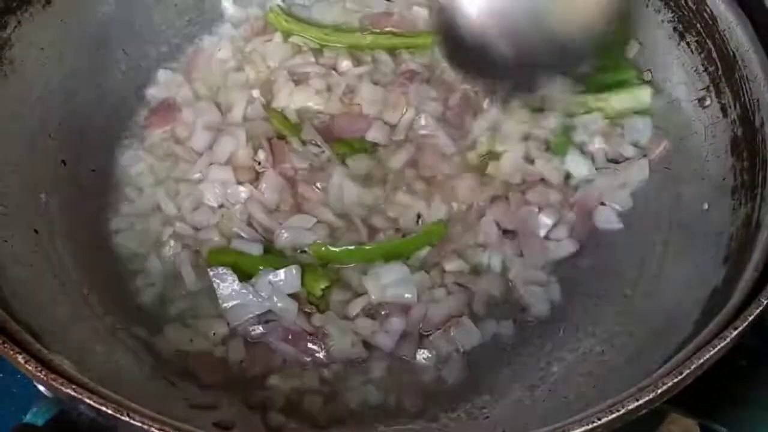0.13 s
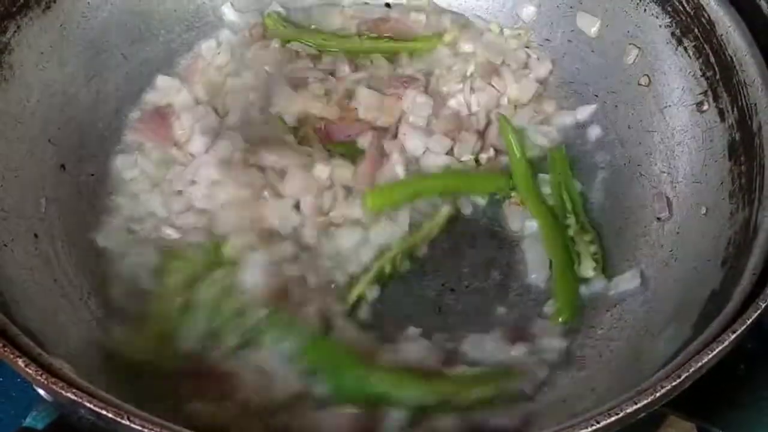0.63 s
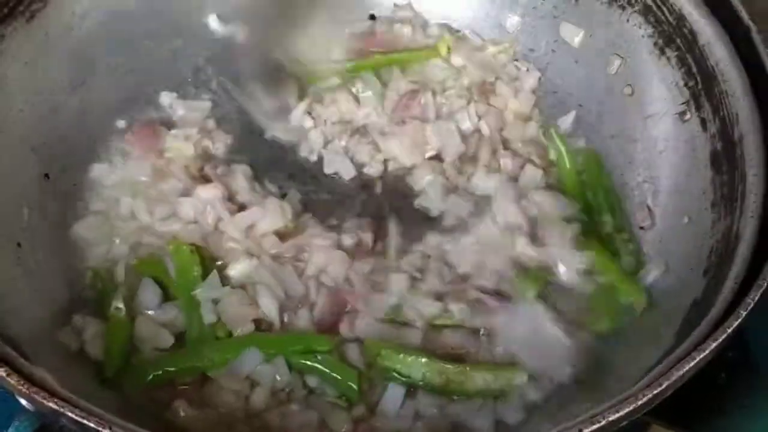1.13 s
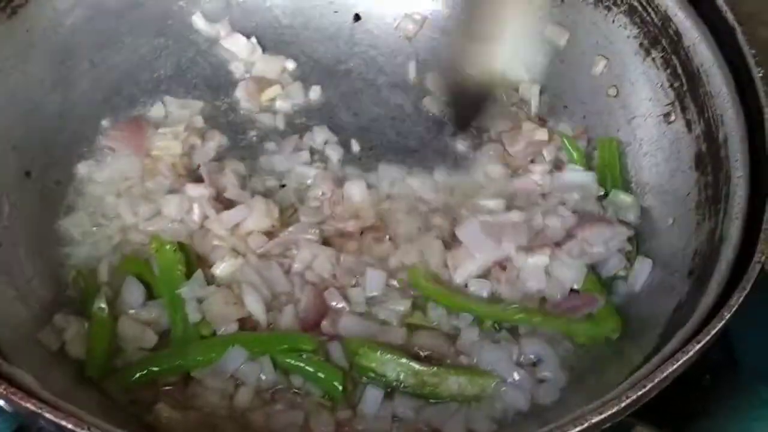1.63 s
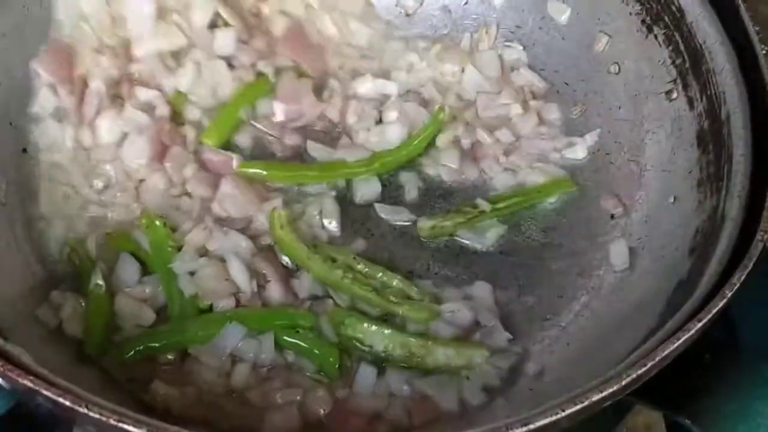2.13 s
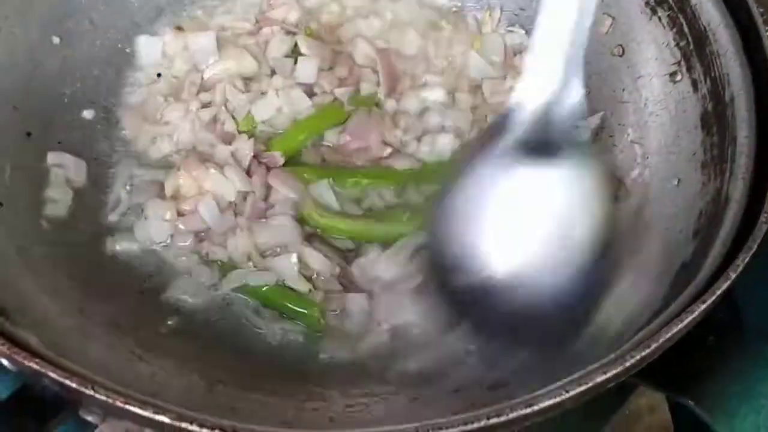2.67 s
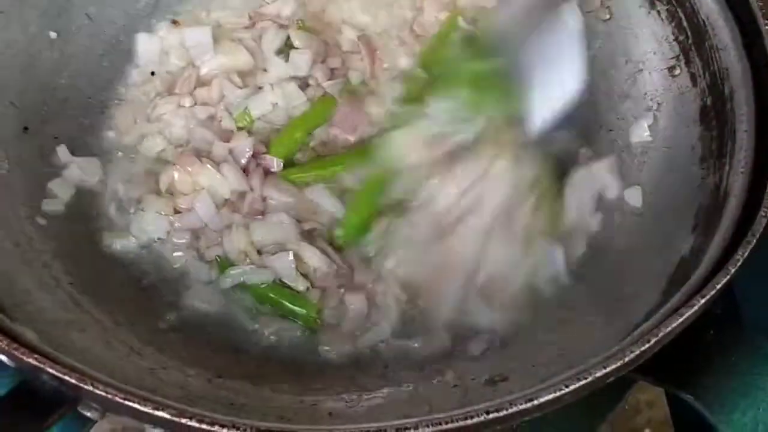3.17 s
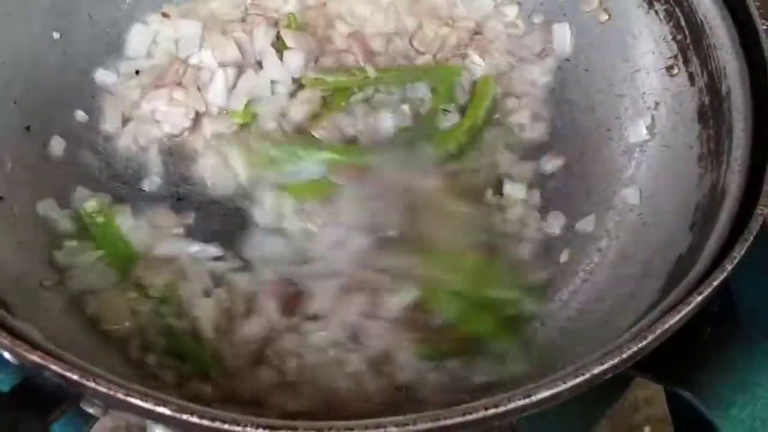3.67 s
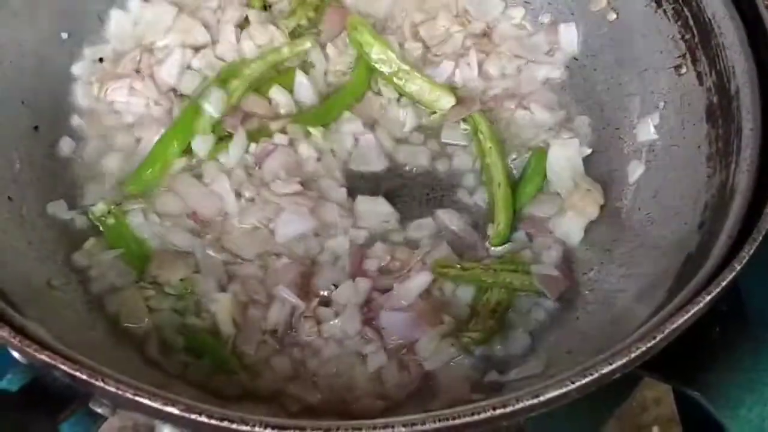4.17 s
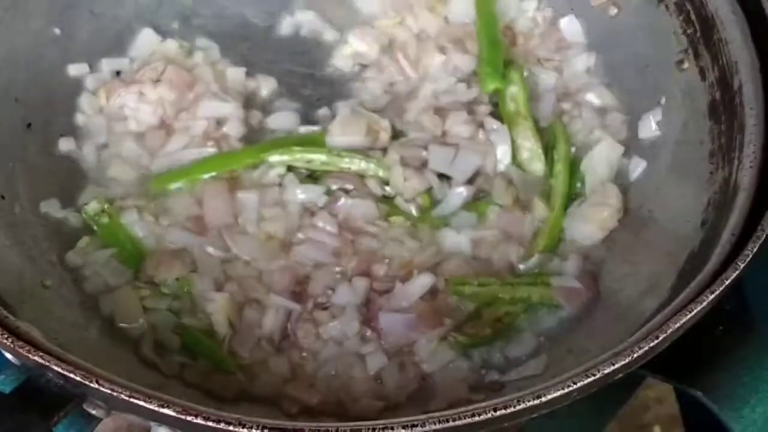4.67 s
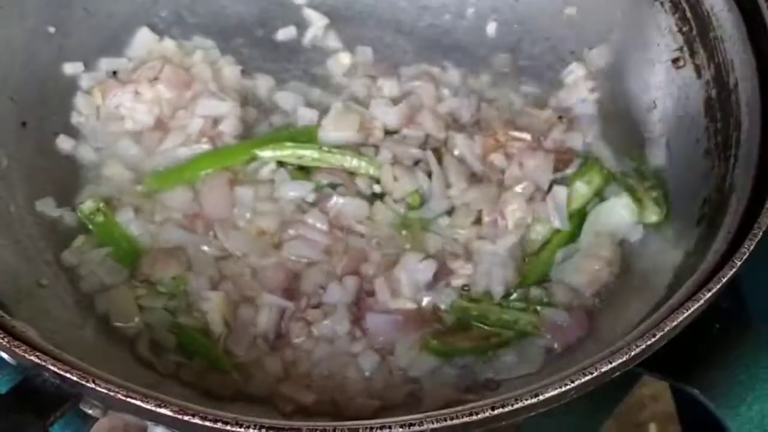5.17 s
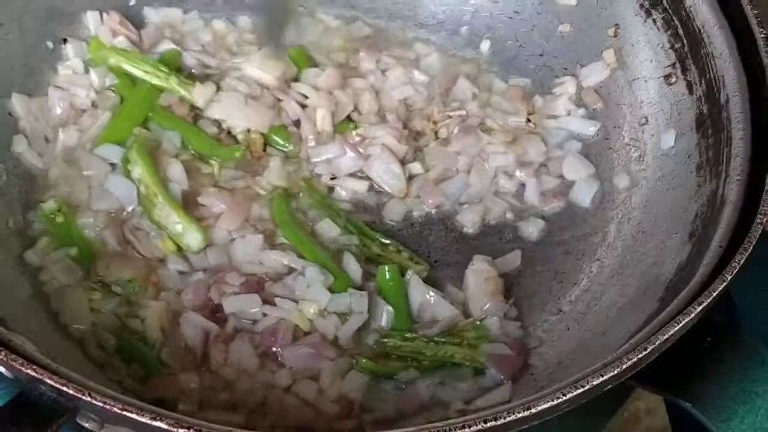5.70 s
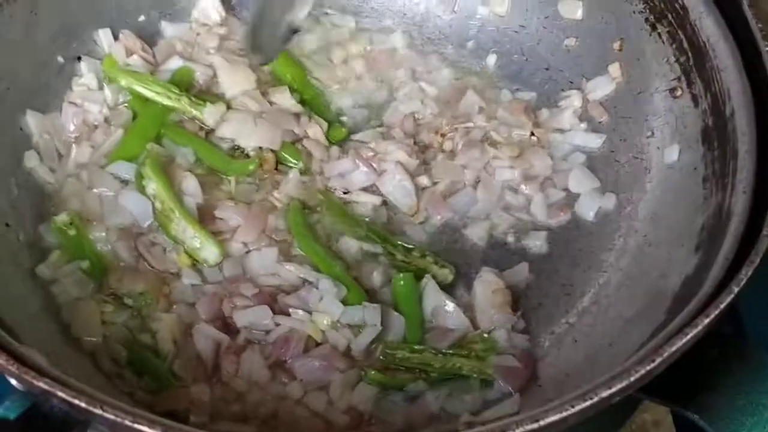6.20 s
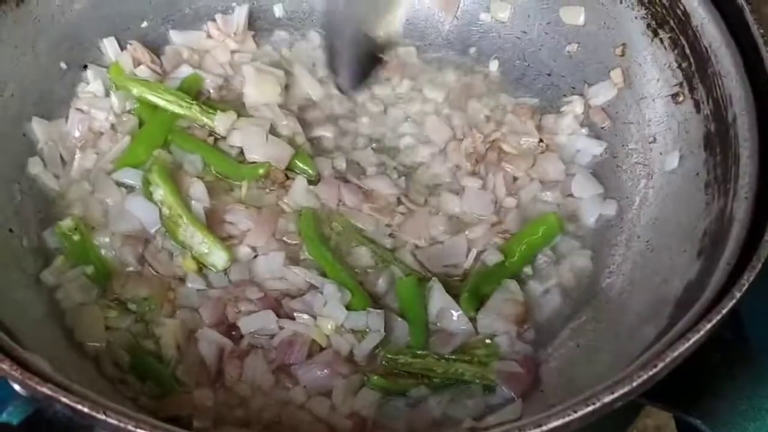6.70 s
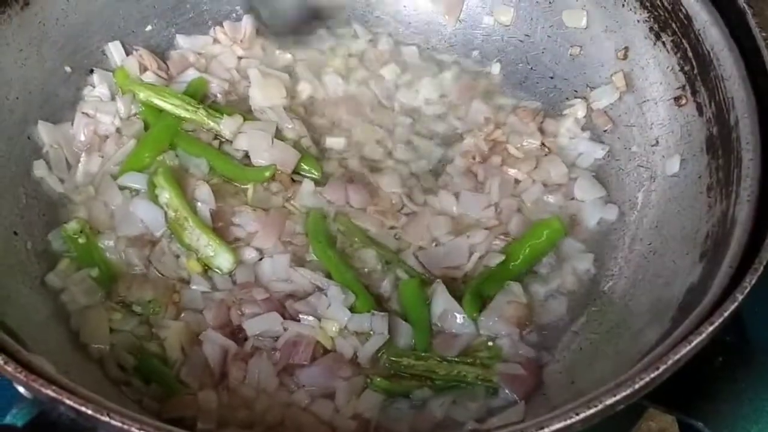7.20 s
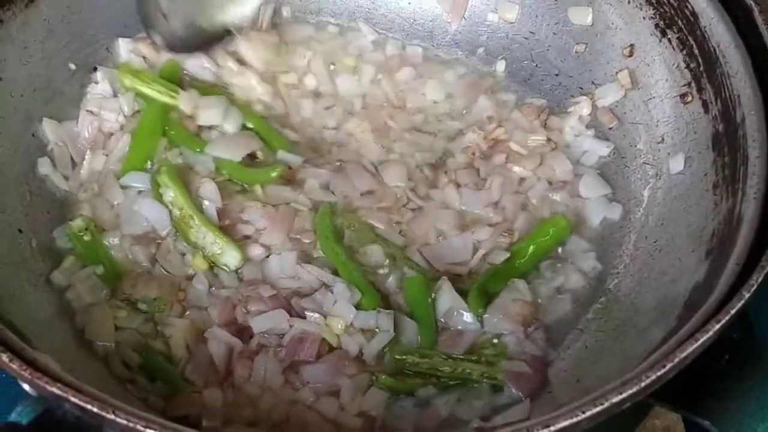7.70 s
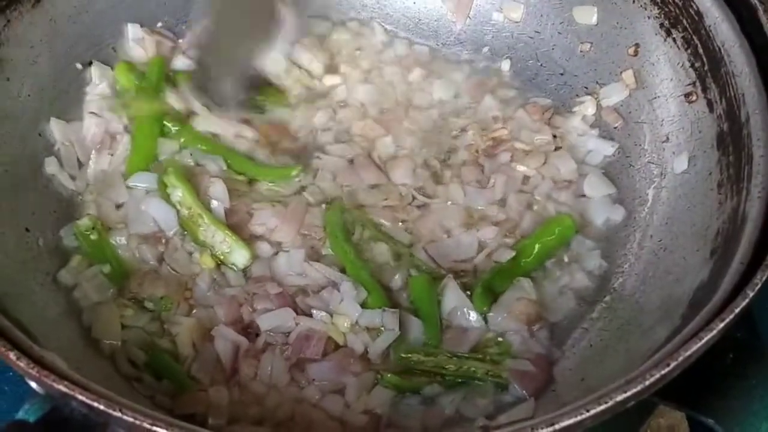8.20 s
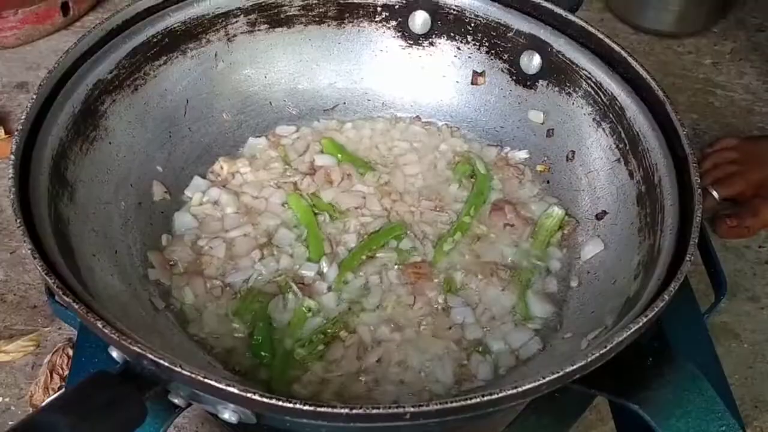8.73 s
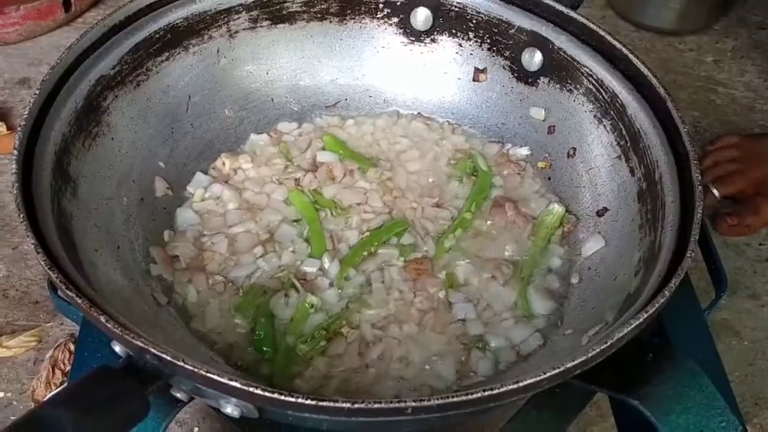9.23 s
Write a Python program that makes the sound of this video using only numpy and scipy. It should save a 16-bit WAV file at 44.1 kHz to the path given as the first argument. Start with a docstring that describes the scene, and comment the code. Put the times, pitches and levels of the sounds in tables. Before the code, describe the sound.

Onions and chillies fry in oil in a metal pan, very close to a small, bright microphone. A dense sizzle runs throughout, broken by sharp pops and snapping steam. A steel ladle knocks and briefly scrapes the pan, busiest in the first five seconds. A faint engine rumbles far off. The background level keeps jumping and dipping, then everything cuts off at about 8.7 seconds.

```python
"""Chopped onions and chillies fry in oil in a round metal pan, close under a small microphone.
From the start, bursting steam bubbles sizzle as clicks and noise, over a far engine of sine waves and a noise rumble.
Louder pops (short filtered bursts) and snaps (single pressure steps) soon break out of the sizzle.
Then a steel ladle knocks and scrapes the pan, ringing its modes, which are sine waves that die away.
The whole background jumps up in level and dips briefly all along, until everything stops dead."""
import sys
import numpy as np
from scipy import signal
from scipy.fft import rfft, irfft
from scipy.io import wavfile
from scipy.ndimage import uniform_filter1d

SR = 44100
rng = np.random.default_rng(int(sys.argv[2]) if len(sys.argv) > 2 else 0)


def waveform_to_disk(signal):
    """Save audio, clipped to [-1, 1], as 16-bit WAV at the path in sys.argv[1]."""
    frames = np.transpose(np.atleast_2d(signal))
    scaled = np.clip(frames, -1, 1) * 32767
    samples = np.round(scaled).astype(np.int16)
    wavfile.write(sys.argv[1], SR, samples)


def boost(x):
    """Linear amplitude factor 10**(x/20) for a level x in decibels (scalar or array-like)."""
    u = np.asarray(x, float) / 20
    return 10 ** u


N = 412315
STOP_S = 8.693  # all sound ends here


def level(x, db):
    """Scale to an rms level."""
    return x * boost(db) / np.sqrt(np.mean(x ** 2))


def band(x, hz, width):
    """Resonant band-pass, centre and width in Hz."""
    return signal.lfilter(*signal.iirpeak(min(hz, .45 * SR), hz / width, fs=SR), x)


def response(points, size=2048):
    """Causal impulse response with the colour of (Hz, dB) points, its energy as early as possible."""
    hz, db = np.transpose(points)
    f = np.arange(size // 2 + 1) * SR / size
    log_gain = np.log(boost(np.interp(np.log(f + 1), np.log(hz), db)))
    # folding the cepstrum forward in time makes the response causal
    cepstrum = irfft(log_gain)
    cepstrum[1:size // 2] *= 2
    cepstrum[size // 2 + 1:] = 0
    return irfft(np.exp(rfft(cepstrum)))


def ring(modes, centre_hz, octaves, detune=.02, size=8192):
    """Impulse response of decaying modes; those near the centre are excited most, each a little by chance."""
    hz, db, t60 = np.transpose(modes)[:, :, None]
    level_chance, pitch_chance = rng.standard_normal((2, len(modes), 1))
    db = db - 6 * (np.log2(hz / centre_hz) / octaves) ** 2 + 2.5 * level_chance
    t = np.arange(size) / SR
    # neighbouring modes push opposite ways, so no bass is left below them
    sign = (-1) ** np.arange(len(modes))[:, None]
    tone = np.sin(2 * np.pi * hz * (1 + detune * pitch_chance) * t)
    decay = np.exp(-np.log(1000) * t / t60)
    return np.sum(sign * boost(db) * tone * decay, 0)


def curve(table, column):
    """One table column at every sample, in straight lines between rows."""
    return np.interp(np.arange(N) / SR, np.array(table)[:, 0], np.array(table)[:, column])


def walk(rate):
    """Slow random wander, spread near 1, from a fresh random value `rate` times a second."""
    k = int(SR / rate)
    stairs = np.repeat(rng.standard_normal(N // k + 1), k)
    return 1.46 * uniform_filter1d(uniform_filter1d(stairs, k), k)[:N]


def clicks(rate, spread_db, top_db):
    """Random one-sample clicks, about `rate` a second; most are small, a few are large."""
    when, size, side = rng.random((3, N))
    size_db = np.minimum(-spread_db * np.log(1 - size), top_db)
    return (when < rate / SR) * boost(size_db) * np.sign(side - .5)


def add(out, s, sound, peak_db):
    """Mix a short sound in at time s with a given peak."""
    i = int(s * SR)
    out[i:i + len(sound)] += (sound * boost(peak_db) / np.abs(sound).max())[:N - i]


# How hard the pan fries. Each row: time in seconds, strength in dB.
FRYING_STRENGTH = [(0, -30), (.6, -29), (1.2, -29), (1.7, -30), (2.1, -26.5), (2.6, -29), (3.1, -29.5),
                   (3.35, -33.5), (3.7, -29.5), (4.2, -29), (4.8, -30), (5.2, -32), (5.6, -30.5),
                   (6.2, -31.5), (7, -31.5), (7.8, -32.5), (8.3, -33), (8.7, -33.5)]
# The whole background jumps up in level and settles, as an automatic gain control would make it.
# Each row: start in seconds, rise in dB (below zero it falls), settling time in seconds.
LEVEL_JUMPS = [(0, 2.5, 0.022), (.1, 1.5, .04), (.235, 1.5, .1), (0.291, 4.5, 0.066), (.435, 4, 0.046),
               (.675, 1, 0.064), (.85, 7.5, 0.027), (.992, 2.5, 0.056), (1.227, 8, 0.021),
               (1.313, 5.5, 0.063), (1.554, 1, 0.053), (2.07, 3, 0.035), (2.145, 6, 0.027),
               (2.835, 0.5, 0.072), (3.035, 6.5, 0.042), (3.55, 4.5, 0.075), (3.819, 7.5, 0.028),
               (4.175, 8, 0.013), (4.55, 9, 0.013), (4.65, 1.5, 0.079), (4.928, 8.5, 0.023),
               (5.39, 3, 0.13), (5.896, 3.5, 0.09), (6.622, 2.5, 0.025), (6.886, 4, 0.025),
               (7.07, 1.5, 0.032), (7.2, -1, 0.024), (7.415, 6.5, 0.016), (7.665, 7, 0.014), (8.02, 0, .02),
               (8.52, 3, .05)]
# The whole background sags, then springs back.
# Each row: moment of springing back in seconds, length of the sag before it in seconds, depth in dB.
BRIEF_DIPS = [(0.224, 0.093, 13), (0.428, 0.07, 4.5), (0.679, 0.089, 4), (0.845, 0.049, 2),
              (1.13, 0.11, 5.5), (1.298, 0.091, 5.5), (1.804, 0.066, 6.5), (2.236, 0.075, 6),
              (2.825, 0.058, 7), (3.525, .092, 7), (3.702, 0.1, 5), (4.379, 0.055, 6), (4.611, 0.06, 9),
              (5.004, 0.059, 3), (5.384, 0.09, 0), (6.021, 0.07, 7.5), (6.27, 0.053, 5.5),
              (6.381, 0.11, 10.5), (6.723, 0.091, 5), (6.953, 0.033, 4), (7.397, 0.11, 1.5),
              (8.447, .05, 1.5)]
FLUTTER_DB, FLUTTER_HZ = .7, 30
SAG_POWER, SPRING_S = 0.36, 0.0059  # power of the sag's progress; time to spring back


def background_db():
    """Frying strength with a flutter; the level jumps up and settles, or sags and springs back."""
    t = np.arange(N) / SR
    db = curve(FRYING_STRENGTH, column=1) + FLUTTER_DB * walk(FLUTTER_HZ)
    for s, rise_db, settle in LEVEL_JUMPS:
        db = db + rise_db * (t >= s) * np.exp(-np.maximum(t - s, 0) / settle)
    for s, length, depth_db in BRIEF_DIPS:
        sag = np.clip(1 + (t - s) / length, 0, 1) ** SAG_POWER
        db = db - depth_db * sag * np.exp(-np.maximum(t - s, 0) / SPRING_S)
    return db


# Colour of the sizzle, with the microphone's two treble peaks.
# Each row: frequency in Hz, relative level in dB per Hz.
SIZZLE_COLOUR = [(150, -51), (250, -17.5), (419, -19.5), (668, -11.5), (850, -9.5), (1050, -13),
                 (1240, -6.5), (1480, -10.5), (2230, -6.5), (4770, -12), (6070, -9.5), (7700, -0.5),
                 (9180, -8.5), (11500, -5.5), (13800, 1.5), (15400, -2.5)]


def sizzle():
    """Bubbles of five sizes burst, each with its own pitch and dying spray, over the hiss of countless smaller ones."""
    crackle = level(clicks(200., 3.0, 12.), -6.5)
    for hz in (2500, 4620, 7500, 11000, 14500):
        bursts = clicks(330., 3.7, 14.3) * boost(2.6 * walk(35))
        # each burst's energy dies away over about 4 ms and sets the loudness of the spray
        energy = signal.lfilter([1], [1, -np.exp(-1 / (.004 * SR))], bursts ** 2)
        spray = energy ** .5 * rng.standard_normal(N)
        bubbles = band(bursts + boost(-22) * spray, hz, 0.7 * hz)
        crackle = crackle + level(bubbles, -6.5 + 2.8 * np.log2(hz / 7600))
    hiss = rng.standard_normal(N) * boost(1.5 * walk(40))
    both = level(crackle, -2.7) + level(hiss, -4.5)
    return level(signal.fftconvolve(both, response(SIZZLE_COLOUR))[:N], -0.87)


# Steady part of the engine's firing orders. Each row: multiple of the cycle rate, level in dB before it wavers.
ENGINE_ORDERS = [(2, -65), (4, -70), (5, -77.5), (6, -80.5), (7, -77.5), (8, -75.5), (9, -82), (10, -76),
                 (11, -77.5), (12, -77)]
# The boom swells and fades.
# Each row: middle in seconds, half length in seconds, strength in dB, centre in Hz.
BOOM_SWELLS = [(1.45, 0.34, -71.5, 146), (2.03, .12, -68, 146), (2.45, .15, -65.5, 144),
               (3.9, 0.43, -58, 170), (4.5, 0.094, -62, 155), (4.9, 0.37, -65, 174),
               (6.15, .25, -66.5, 128), (6.5, .2, -67.5, 125), (7.1, 0.36, -74.5, 139)]
CYCLE_HZ, CYCLE_WANDER = 19, .06  # cycle rate, and its wander as a share
BOOM_FLOOR_DB = -77  # boom between swells


def drone():
    """A slow engine far off: its firing orders waver alone; a swelling boom lifts a few of the upper ones."""
    t = np.arange(N) / SR
    hz = CYCLE_HZ * (1 + CYCLE_WANDER * walk(3))
    swells = sum(boost(db - 10 * ((t - s) / half) ** 2) for s, half, db, _ in BOOM_SWELLS)
    boom = boost(BOOM_FLOOR_DB) + swells
    boom_hz = curve(BOOM_SWELLS, column=3)
    turns, out = np.cumsum(hz) / SR, 0
    for k, db in ENGINE_ORDERS:
        lift = boom * boost(-4.9 * (np.log2(k * hz / boom_hz) / 0.31) ** 2)
        waver = boost(3.1 * walk(5.9)) * np.sin(2 * np.pi * (k * turns + .15 * walk(4)))
        out = out + (boost(db) + lift) * waver
    return out


# Colour of the rumble. Each row: frequency in Hz, relative level in dB per Hz.
RUMBLE_COLOUR = [(12, -35), (20, 7.5), (42, -4), (86, -5), (155, -5.5), (260, -16), (340, -51), (570, -120)]


def rumble():
    """Steady low noise of burner and surroundings."""
    noise = signal.fftconvolve(rng.standard_normal(N), response(RUMBLE_COLOUR, size=16384))[:N]
    return level(noise, -62)


# The loudest bursts of steam. Each row: start in seconds, peak of the click in dB, centre in Hz.
LOUD_POPS = [(0.0171, -9.5, 10200), (0.0491, -13, 13700), (0.4329, -18, 10900), (0.5279, -14, 8600),
             (0.5517, -19, 10400), (0.5867, -15, 7700), (0.7873, -7, 8100), (0.9851, -16, 9100),
             (1.005, -10, 7140), (1.1958, -8.5, 7300), (1.2281, -7, 12800), (1.4301, -11, 13600),
             (1.5493, -10, 13400), (1.7153, -7.5, 9100), (2.0778, -10, 8000), (2.1392, -7, 12300),
             (2.3097, -10.0, 12040), (2.3557, -9.5, 8200), (2.4166, -9, 10200), (2.5249, -7, 7900),
             (2.5332, -9, 13700), (2.7361, -8.5, 13500), (2.7453, -10, 7400), (3.001, -16, 13800),
             (3.107, -11, 13400), (3.2222, -4.5, 12800), (3.3134, -10.5, 11800), (3.3607, -14, 10100),
             (3.3726, -11, 11000), (3.4329, -15.5, 8150), (3.5993, -6.5, 9800), (3.6081, -9.0, 14200),
             (3.7629, -12, 13100), (3.8451, -9, 13300), (3.8992, -8, 7760), (3.9866, -8, 13200),
             (4.007, -9, 12000), (4.1142, -12.0, 7900), (4.123, -11, 13100), (4.1781, -5, 12700),
             (4.2935, -5.5, 8900), (4.4463, -14.0, 11600), (4.455, -13.0, 13400), (4.5186, -8.5, 7500),
             (4.5257, -17, 13400), (4.5492, -7, 13100), (4.8364, -8, 8950), (4.881, -16, 11600),
             (4.9278, -6, 10600), (5.0227, -7.5, 12800), (5.0538, -10, 13100), (5.1888, -9, 13300),
             (5.3939, -8, 8700), (5.4019, -10, 9400), (5.5971, -8.0, 8200), (5.6759, -15, 11300),
             (5.7098, -14, 8000), (5.9075, -8.5, 7900), (5.9119, -14.0, 12600), (5.9488, -12, 11000),
             (6.0762, -10, 8700), (6.1379, -22, 11100), (6.198, -9, 8400), (6.2749, -11, 9000),
             (6.2898, -8.5, 13500), (6.3975, -14, 7700), (6.5027, -9, 12600), (6.6523, -8.5, 12800),
             (6.9055, -12, 13600), (7.0727, -9, 7400), (7.0781, -14.0, 7900), (7.0936, -7.5, 9100),
             (7.2033, -11, 10700), (7.48, -12, 10900), (7.6724, -9, 9600), (7.7761, -21, 12500),
             (7.7979, -11.5, 7150), (7.8581, -13, 13900), (8.0278, -8.5, 7100), (8.4921, -15.5, 12900)]
# Lesser bursts come at random: how many, peak in dB over the frying, its scatter in dB, range of centres in Hz
LESSER_POPS = 160
LESSER_DB, LESSER_SCATTER_DB, LESSER_HZ = 16, 4, (6400, 14200)


def pops(frying_db):
    """A sharp click coloured by bubble size, a faint thud under it and a short spray after it."""
    out, t = np.zeros(N), np.arange(1024) / SR
    colour = response(SIZZLE_COLOUR)[:1024]
    thud = band(colour, 2500, 5000)
    when, size, pitch = rng.random((LESSER_POPS, 3)).T
    # lesser pops shrink in the dips but do not grow in the jumps
    base_db = np.minimum(frying_db, curve(FRYING_STRENGTH, column=1))
    base_db = base_db[(when * STOP_S * SR).astype(int)]
    lesser_db = base_db + LESSER_DB + LESSER_SCATTER_DB * (2 * size - 1)
    lesser = np.transpose([when * STOP_S, lesser_db, np.interp(pitch, (0, 1), LESSER_HZ)])
    for s, db, hz in np.vstack([LOUD_POPS, lesser]):
        fade = np.exp(-t / 0.00076) + boost(-12) * np.exp(-t / 0.0051)
        burst = (t == 0) + boost(-16.5) * rng.standard_normal(1024) * fade
        add(out, s, band(np.convolve(burst, colour)[:1024], hz, 0.37 * hz), db)
        add(out, s, thud, db - 20.5)
    return out


# Modes of the pan, damped by the food; knocks and scrapes ring them too.
# Each row: frequency in Hz, relative level in dB, time to fall by 60 dB in seconds.
PAN_MODES = [(216, -16.5, 0.92), (283, -13, 0.26), (342, -4.5, 0.05), (400.5, -4.5, 0.069), (467, -6, 0.11),
             (605, 0, 0.028), (707, -1, 0.042), (860, 2.5, 0.043), (1150, -12, 0.11), (1270, 1, 0.057),
             (1572, 3, 0.033), (1700, 0, 0.048), (1976, -6, 0.042), (2270, 10, 0.017), (2420, -2, 0.03),
             (2611, 1.5, 0.045)]
# Drops of oil spatter close to the microphone with a dry crack. Each row: start in seconds, peak of the step in
# dB.
OIL_SNAPS = [(0.148, -21), (0.5869, -8), (1.0056, -19), (1.195, -17), (2.746, -13), (3.4328, -17),
             (3.898, -19), (4.2935, -9.5), (4.5185, -30), (4.926, -12.5), (5.5972, -15), (5.907, -8),
             (6.1983, -7.5), (6.2893, -13), (6.6522, -14.5), (7.0938, -12.5), (7.673, -19),
             (7.7977, -23.5), (8.0276, -13.5)]
# A few snaps leave a slow low thump behind. Each row: start in seconds, peak in dB.
LOW_THUMPS = [(0.1496, -55), (3.434, -58), (6.290, -48)]


def snaps():
    """One dry pressure step across the whole middle range, with a faint ring of the pan after it."""
    out, t = np.zeros(N), np.arange(2048) / SR
    step = band(1. * (t == 0), 1720, 3990)
    for s, db in OIL_SNAPS:
        add(out, s, step, db)
        add(out, s, ring(PAN_MODES, 2000, 1.115), db - 20.5)
    for s, db in LOW_THUMPS:
        add(out, s, np.exp(-np.arange(8192) / SR / 0.06), db)
    return out


# Modes of the steel ladle.
# Each row: frequency in Hz, relative level in dB, time to fall by 60 dB in seconds.
LADLE_MODES = [(3440, -5.5, .04), (3600, -0.5, 0.063), (3870, -1, .05), (4800, 3.5, 0.05), (5340, 0, 0.099),
               (5960, 6, 0.066), (7630, -2, .04), (9930, 8, .09), (13500, -4, .1)]
# Ladle meets pan.
# Each row: start in seconds, strength in dB, pan centre in Hz, steel ring against the strength in dB.
LADLE_KNOCKS = [(0.3299, -12, 2270, -6), (0.4505, -12, 790, -16), (0.4611, -18, 678, -12.5),
                (0.8512, -16, 570, -6), (1.2278, -21, 1480, 0), (1.287, -28.5, 820, -14),
                (1.5604, -24, 2250, -9), (1.7146, -10.5, 1400, -18), (2.014, -31.5, 1550, -17.5),
                (2.15, -21, 1240, -3), (2.466, -23.5, 1500, -16), (2.5992, -19.5, 1820, -23),
                (2.8375, -33.5, 673, -16), (2.904, -31.5, 903, -17.5), (3.0399, -14, 2600, -7.5),
                (3.8209, -11.5, 766, -15.5), (4.1509, -22, 1700, -22), (4.1765, -23, 650, -17),
                (4.5492, -23, 694, -12), (4.7653, -16, 1632, -14), (4.8368, -26, 1270, -5),
                (5.8526, -24, 3300, -8), (6.5664, -32, 4500, 9), (6.6162, -25, 2420, -5),
                (7.0183, -24.5, 2570, -13), (7.29, -25.5, 2232, -16), (7.5795, -24.5, 2170, -14),
                (7.898, -31, 1000, -15), (7.955, -19, 1160, -20), (8.1458, -25.5, 897, -17),
                (8.3195, -30.5, 710, -14)]
LADLE_HZ = 4900  # the ladle's modes near here ring most
RATTLE_S, RATTLE_DOUBLES_DB = .011, 13  # rattle after a -21 dB blow; twice as long for so many dB more
BOWL_ECHO_S, BOWL_ECHO = .00045, 0.51  # the far wall of the pan throws each blow back: delay, share


def knocks():
    """A blow and its bounces ring the pan near the spot struck, over a dry clack; a hard edge rings the ladle."""
    out, t = np.zeros(N), np.arange(4096) / SR
    for s, db, pan_hz, steel_db in LADLE_KNOCKS:
        rattle = RATTLE_S * 2 ** ((db + 21) / RATTLE_DOUBLES_DB)
        bounces = rng.standard_normal(4096) * (rng.random(4096) < .025)
        blow = (t == 0) + boost(-13) * bounces * np.exp(-t / rattle)
        pan = signal.fftconvolve(blow, ring(PAN_MODES, pan_hz, 1.22))
        clack = band(band(blow, pan_hz, 1.0 * pan_hz), pan_hz, 1.5 * pan_hz)
        steel = signal.fftconvolve(blow, ring(LADLE_MODES, LADLE_HZ, 1.0, detune=0.0099))
        add(out, s, pan, db - 9.5)
        add(out, s, clack, db - 1.5)
        add(out, s, steel, db + steel_db - 3)
    return out + BOWL_ECHO * np.roll(out, int(BOWL_ECHO_S * SR))


# Ladle dragged along the pan. Each row: start in seconds, firmest moment in seconds, end in seconds,
# level of the low ring when firmest in dB, bare edge (high ring against the low one) in dB.
LADLE_SCRAPES = [(0.462, 0.477, 0.53, -52, 0), (0.852, 0.87, 0.972, -43.5, -4),
                 (1.3, 1.307, 1.362, -43.5, -5), (2.205, 2.348, 2.51, -43, -10.5),
                 (3.08, 3.116, 3.155, -40.5, 4), (4.165, 4.25, 4.32, -45.5, -8),
                 (4.588, 4.675, 4.75, -44, -10)]
LIFT_OFF_DB = -16.5  # level at both ends of a stroke, against its firmest moment


def scrape():
    """Stick-slip clicks, uneven in pace, ring the same pan; a bare edge on bare metal reaches the upper modes."""
    slips = clicks(450., 4.1, 15.) * boost(2.5 * walk(45))
    t, out = np.arange(N) / SR, np.zeros(N)
    for start, firmest, end, db, edge_db in LADLE_SCRAPES:
        on = (t > start) & (t < end)
        slack = np.interp(t[on], (start, firmest, end), (1, 0, 1)) ** 3
        low, high = (level(signal.fftconvolve(slips[on], ring(PAN_MODES, hz, 2.14))[:on.sum()], 0)
                     for hz in (400, 1700))
        out[on] = boost(db + LIFT_OFF_DB * slack) * (low + boost(edge_db) * high)
    return out


# Calmer frying is duller: the top loses this many dB per dB under brisk, and gains as much above it
BRISK_DB, DULL_HZ, DULL_SHARE = -30.5, 9000, .45


def scene():
    """All sources; the bass follows the quick moves of the background only in part."""
    steps = background_db()
    quick_moves = steps - uniform_filter1d(steps, size=SR)
    low = (drone() + rumble()) * boost(0.81 * quick_moves)
    # the ladle sounds carry no deep bass
    no_bass = signal.butter(2, 200, "high", fs=SR, output="sos")
    ladle = signal.sosfilt(no_bass, knocks() + scrape())
    fry = sizzle()
    top = signal.sosfilt(signal.butter(1, DULL_HZ, "high", fs=SR, output="sos"), fry)
    top_gain = boost(DULL_SHARE * (curve(FRYING_STRENGTH, column=1) - BRISK_DB))
    fry = fry + top * (top_gain - 1)
    mix = fry * boost(steps) + pops(steps) + snaps() + ladle + low
    return (mix * (np.arange(N) < STOP_S * SR))[None]


def roll_off(x):
    """The treble ends steeply here."""
    return signal.sosfilt(signal.butter(12, 16640, fs=SR, output="sos"), x)


def record(dry):
    """The treble is cut steeply above 15600 Hz."""
    cut = signal.sosfilt(signal.ellip(10, .2, 60, 15600, fs=SR, output="sos"), dry)
    return roll_off(cut)


dry = scene()
out = record(dry)
waveform_to_disk(out)
```